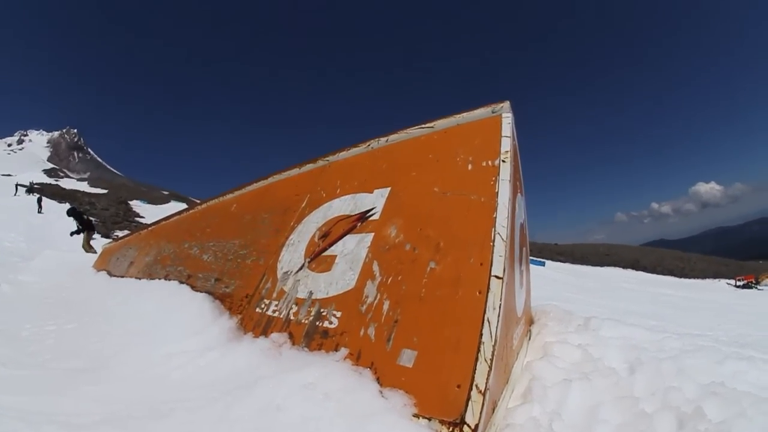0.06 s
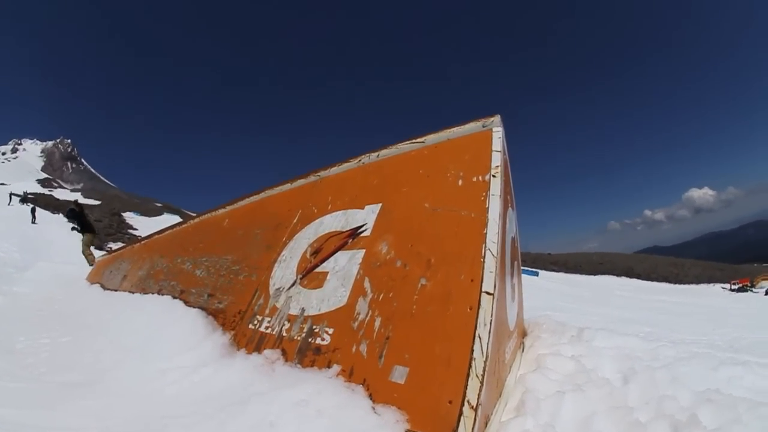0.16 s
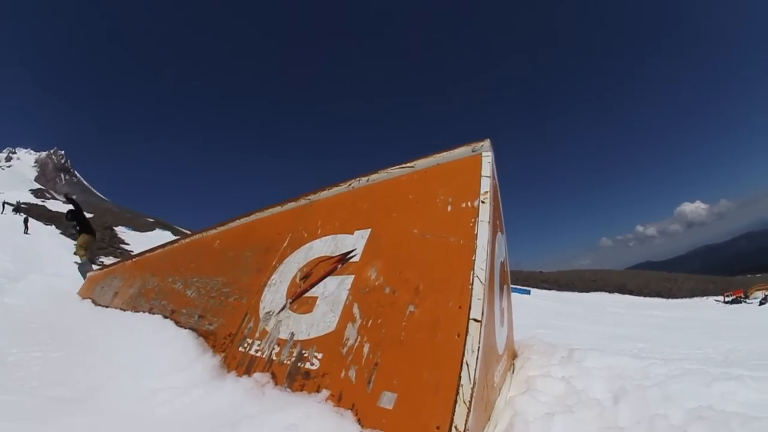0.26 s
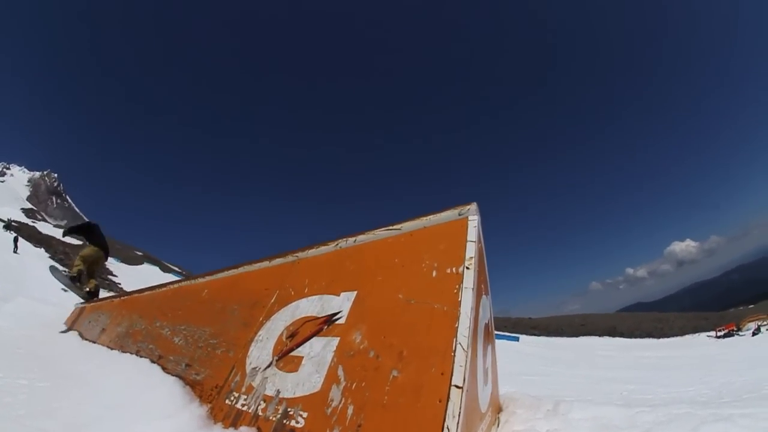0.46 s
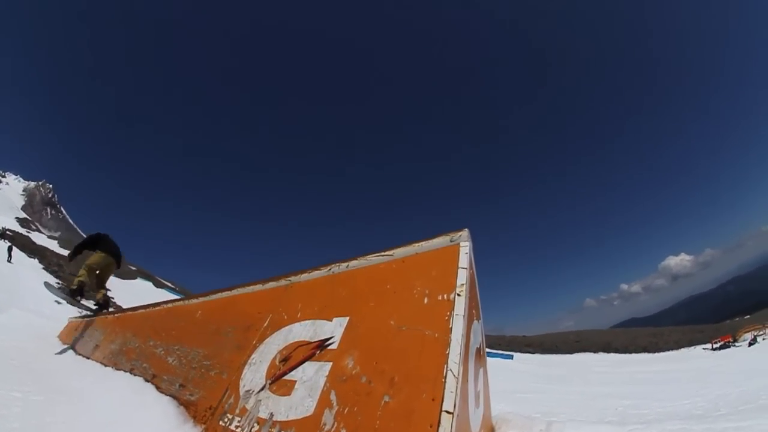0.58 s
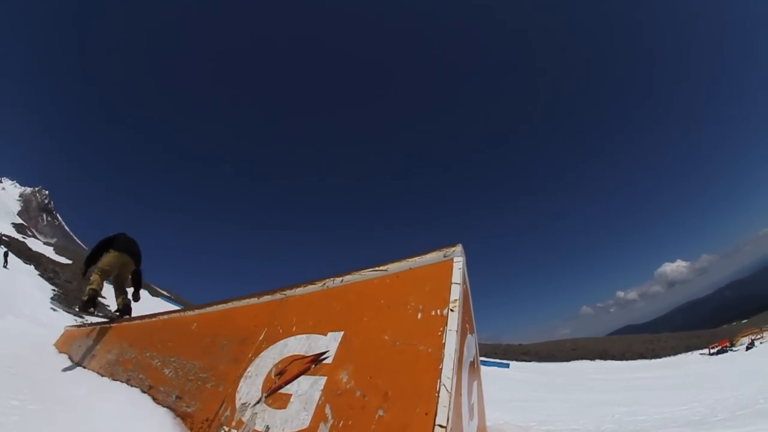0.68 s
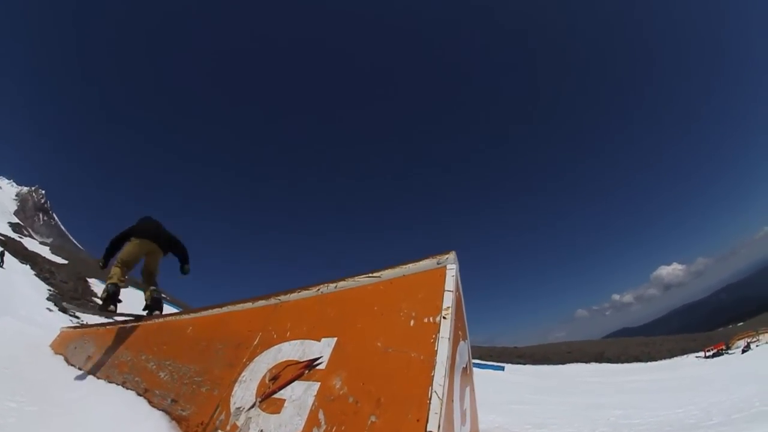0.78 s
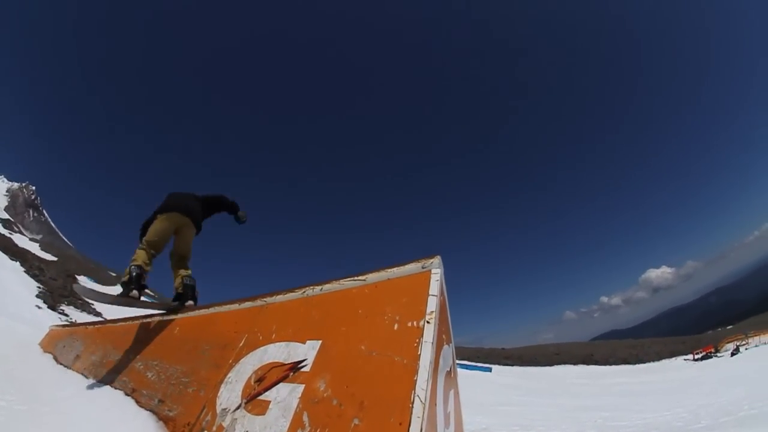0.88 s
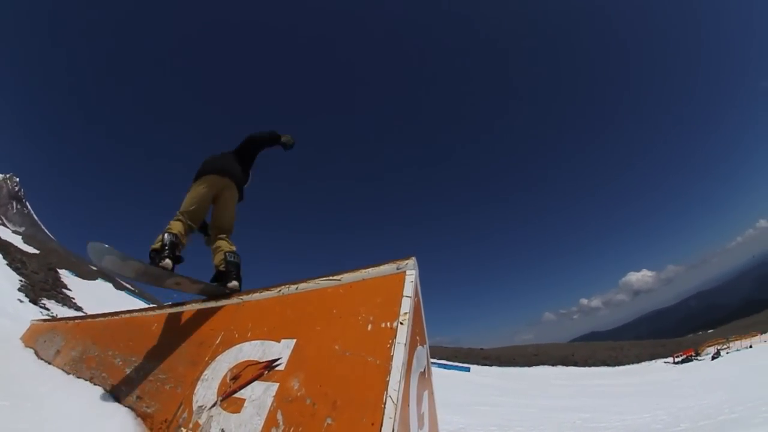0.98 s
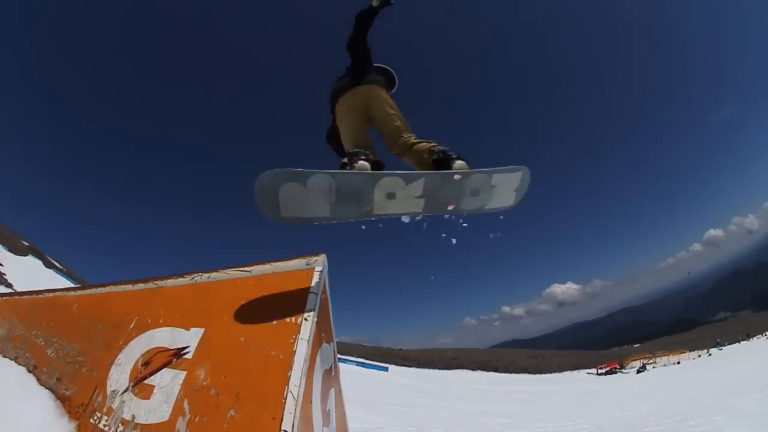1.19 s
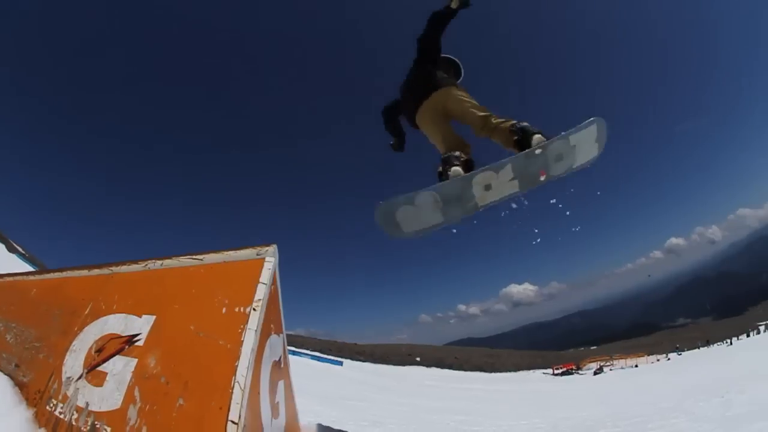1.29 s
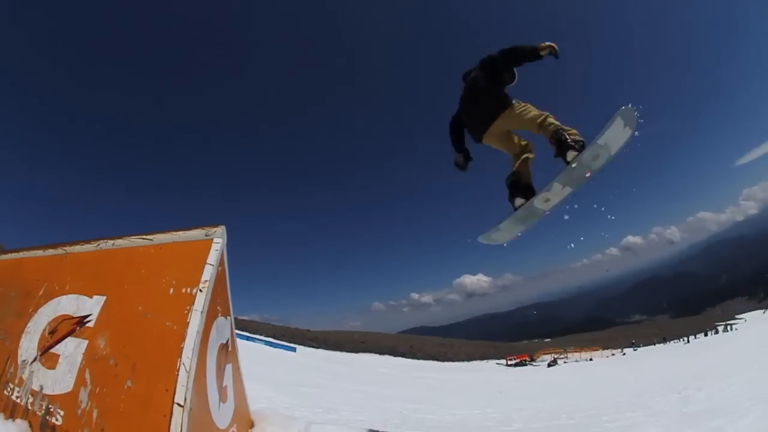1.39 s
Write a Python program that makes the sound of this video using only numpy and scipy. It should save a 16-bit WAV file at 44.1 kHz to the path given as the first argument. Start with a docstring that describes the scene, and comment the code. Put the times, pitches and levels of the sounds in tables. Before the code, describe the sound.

A snowboard hisses over wet snow, smacks onto a hollow ramp with a loud crack, then grinds up it and rasps off the lip. Wind buffets the close microphone on an open slope, and snow crumbs tick against it.

```python
"""A second board following behind hisses steadily over wet spring snow; the rider carves, then lands on a
hollow ramp with a loud crack. It grinds up the ramp, rumbles and rasps off the lip; the steel edge rings
briefly in the air. Scrapes are countless tiny slips and crushed ice grains; on the ramp they excite board and
ramp modes. Wind buffets the moving microphone, and crumbs of snow tick against it."""
import sys
import numpy as np
from scipy import signal
from scipy.fft import rfft, irfft, next_fast_len
from scipy.io import wavfile
from scipy.ndimage import uniform_filter1d

SR = 44100
rng = np.random.default_rng(int(sys.argv[2]) if len(sys.argv) > 2 else 0)


def pcm_store(signal):
    """Save signal as 16-bit PCM."""
    levels = np.round(np.clip(np.atleast_2d(signal), -1, 1) * 32767)
    wavfile.write(sys.argv[1], SR, levels.astype(np.int16).T)


N = 63945
T = np.arange(N) / SR


def amp(db):
    """Decibels to gain."""
    return 10 ** (np.asarray(db) / 20)


def unit(x):
    """Scale to rms 1."""
    return x / np.sqrt(np.mean(x ** 2) + 1e-20)


def level(curve):
    """Gain along a level curve; falls 800 dB/s outside it."""
    time_s, db = np.transpose(curve)
    outside_s = np.maximum(time_s[0] - T, 0) + np.maximum(T - time_s[-1], 0)
    return amp(np.interp(T, time_s, db) - 800 * outside_s)


def colour(x, tone):
    """Minimum-phase filter of unit energy with the given spectral shape."""
    size = next_fast_len(2 * N)
    hz, db = np.transpose(tone)
    bin_hz = abs(np.fft.fftfreq(size, 1 / SR))
    log_gain = np.log(amp(np.interp(np.log(bin_hz + 1), np.log(hz), db)))
    response = unit(np.exp(log_gain)) * np.exp(-1j * signal.hilbert(log_gain).imag)
    return np.fft.ifft(np.fft.fft(x, size) * response).real[:N]


def wander(hz):
    """Random drift up to the given rate, rms 1."""
    rolloff = 1 + (np.fft.rfftfreq(N, 1 / SR) / hz) ** 4
    return unit(irfft(rfft(rng.standard_normal(N)) / rolloff, N))


def decay(start_s, decay_s):
    """Sudden start, exponential fall."""
    return (T >= start_s) * np.exp(-np.maximum(T - start_s, 0) / decay_s)


def ring(modes, t60_s):
    """Sum of dying modes."""
    return sum(amp(db - 60 * T / t60_s) * np.sin(2 * np.pi * hz * T) for hz, db in modes)


def bursts(rows, tone):
    """Short noise bursts of one colour."""
    envelope = sum(amp(db) * decay(start_s, decay_s) for start_s, db, decay_s in rows)
    return colour(rng.choice([-1, 1], N) * envelope, tone)


def wind():
    """Wind on the microphone: lumpy rumble and low buffets of a cycle or two."""
    # rumble envelope (time [s], level [dB])
    rumble_curve = [(0, -33), (.12, -32.5), (.175, -38), (.28, -32.5), (.41, -30.5), (.53, -28),
                    (.88, -28.5), (1.08, -45), (1.2, -36), (1.45, -40)]
    # rumble spectrum (frequency [Hz], relative level [dB])
    rumble_tone = [(25, -26), (60, 6), (150, 6), (250, -10.5), (400, -12), (1000, -16), (2500, -27),
                   (16000, -64)]
    # buffets and bumps (crest time [s], level [dB], pitch [Hz])
    buffets = [(.091, -20, 79.5), (0.259, -10.5, 132), (0.268, -12, 168), (0.299, -13, 156),
               (0.311, -14, 161), (0.386, -16.5, 162), (0.502, -14.5, 221), (.522, -13.5, 255),
               (0.533, -15.5, 170), (0.561, -12.5, 200), (0.599, -8, 176), (0.613, -9.5, 250),
               (.64, -7.5, 171), (0.676, -13, 180), (0.726, -18.5, 162), (1.219, -21.5, 94.5),
               (1.266, -14, 161), (1.287, -12, 118), (1.344, -20, 394)]
    lump_db, width_cycles = 2, 0.39
    rumble = colour(rng.standard_normal(N), rumble_tone)
    out = unit(rumble * amp(lump_db * wander(hz=29.5))) * level(rumble_curve)
    for (crest_s, db, hz), phase in zip(buffets, rng.random(len(buffets))):
        cycles = (T - crest_s) * hz
        envelope = amp(db) / np.cosh(np.clip(cycles / width_cycles, -20, 20))
        out += envelope * np.cos(2 * np.pi * (cycles + phase))
    return out


def ice_ticks():
    """Flying crumbs of icy snow land; harder chips hit the camera housing."""
    # impacts (time [s], level [dB], decay [s])
    crumbs = [(.537, -24, 0.0064), (.884, -20, 0.0056), (1.191, -25.5, 0.0017), (1.279, -16, 0.0025),
              (1.352, -23, 0.0023), (1.358, -18.5, 0.0054)]
    chips = [(1.4166, -15.5, .0007), (1.419, -28, .0018), (1.4425, -27, .0013)]
    # impact spectra (frequency [Hz], relative level [dB])
    crumb_tone = [(1000, -48), (5000, -9.5), (8000, 1), (11800, 7.5), (14000, 6), (16000, -1.5)]
    chip_tone = [(1200, 4), (11000, -3), (16000, -15)]
    return bursts(crumbs, crumb_tone) + bursts(chips, chip_tone)


def slips(spread_db):
    """Tiny slips and crushed ice grains of uneven size, bunched by board chatter."""
    grains_per_s, hiss_gain, chatter_db = 5000, 0.49, 1.5
    sizes = amp(spread_db * np.minimum(rng.exponential(1, N), 4))
    grains = unit(sizes * rng.choice([-1, 1], N) * (rng.random(N) < grains_per_s / SR))
    hiss = hiss_gain * rng.standard_normal(N)
    return unit((grains + hiss) * amp(chatter_db * wander(hz=143)))


def patchy(x, patch_s=.025, patch_hz=420, depth_db=2.1):
    """The contact's colour shifts from moment to moment."""
    hz, time_s, spectra = signal.stft(x, SR, nperseg=256)
    field = uniform_filter1d(rng.standard_normal(spectra.shape), round(patch_hz / hz[1]), axis=0)
    field = unit(uniform_filter1d(field, round(patch_s / time_s[1]), axis=1))
    return signal.istft(spectra * amp(depth_db * field), SR, nperseg=256)[1][:N]


def rub(curve, tone, spread_db):
    """Friction: slips with one spectrum and one envelope."""
    return unit(colour(patchy(slips(spread_db)), tone)) * level(curve)


def snow():
    """Boards on snow: the following board's smooth glide, the rider's carve, the crunch of pushing off."""
    # friction envelopes (time [s], level [dB])
    glide_curve = [(0, -36.5), (.17, -34.5), (.32, -35), (.338, -49), (1.08, -36), (1.125, -35.5),
                   (1.23, -40.5), (1.34, -35), (1.45, -35)]
    carve_curve = [(.18, -33), (.201, -26), (.235, -28.5), (.255, -26), (.275, -44), (.33, -40)]
    takeoff_curve = [(.255, -36), (.278, -25), (.306, -18), (.322, -18), (.336, -52)]
    # friction spectra (frequency [Hz], relative level [dB])
    glide_tone = [(100, -9.5), (400, 4), (1000, -1.5), (1700, -5.5), (2700, -4), (5500, -9), (8200, -17),
                  (12000, -10), (16000, -15.5)]
    carve_tone = [(150, 2), (600, 3.5), (1500, 4), (2600, 7), (5500, -6.5), (8300, -14.5), (12500, -4.5),
                  (16000, -16)]
    takeoff_tone = [(200, -17), (900, -17), (1900, -7), (2750, 1), (3600, -8), (6200, -24.5), (8000, -31),
                    (16000, -38)]
    glide = unit(colour(rng.standard_normal(N), glide_tone)) * level(glide_curve)
    carve = rub(carve_curve, carve_tone, spread_db=2.5)
    takeoff = rub(takeoff_curve, takeoff_tone, spread_db=0)
    return glide + carve + takeoff


def free_edge(start_s=1.106):
    """The steel edge rings unsteadily as it leaves the lip."""
    # edge modes (frequency [Hz], level [dB])
    modes = [(4517, -41), (7176, -36.5), (10120, -37.5), (14013, -39)]
    tones = sum(ring([mode], t60_s=.22) * wander(hz=160) for mode in modes)
    return np.concatenate([np.zeros(round(start_s * SR)), tones])[:N]


def edge_swishes():
    """Slips through resonances that glide as the edge rolls over."""
    # resonances (start [s], end [s], first pitch [Hz], last pitch [Hz], level [dB])
    swishes = [(0.196, 0.217, 790, 684, -30.5), (0.214, 0.282, 5670, 4060, -27.5),
               (0.453, 0.504, 4300, 5600, -14), (0.977, 1.005, 1270, 1160, -26.5),
               (1.032, 1.078, 3560, 2970, -17), (1.091, 1.113, 4930, 4230, -17.5)]
    out = np.zeros(N)
    for start_s, end_s, first_hz, last_hz, db in swishes:
        progress = np.clip((T - start_s) / (end_s - start_s), 0, 1)
        centre_hz = first_hz + (last_hz - first_hz) * progress
        width_hz = 0.37 * first_hz
        carrier = np.exp(2j * np.pi * np.cumsum(centre_hz) / SR)
        lowpass = signal.butter(2, width_hz / 2, fs=SR)
        band = carrier * signal.lfilter(*lowpass, slips(spread_db=0) / carrier)  # moving band-pass
        out += amp(db) * np.sin(np.pi * progress) * unit(band.real)
    return out


def through_body(x, ring_db):
    """Add the ringing of board and ramp."""
    # board-on-ramp modes (frequency [Hz], relative level [dB])
    modes = [(433, -3), (565, 16.5), (1075, 13.5), (1453, 7), (1803, 4.5), (2025, 0), (2208, -2), (2812, 3),
             (4128, 6), (4385, 14.5)]
    response = ring(modes, t60_s=.2)
    return x + amp(ring_db) * signal.fftconvolve(x, response / np.linalg.norm(response))[:N]


def grind():
    """The board bites, sprays snow, slides, rumbles over the hollow middle and rasps off the lip."""
    # friction and spray envelopes (time [s], level [dB])
    bite_curve = [(.422, -62), (.428, -34), (.448, -17), (.475, -14.5), (.52, -21.5), (.55, -54)]
    spray_curve = [(.422, -84), (.429, -18), (.472, -18.5), (.54, -37), (.552, -58)]
    slide_curve = [(.44, -32), (.585, -30), (.64, -28), (.71, -29.5), (.755, -34), (.81, -26.5),
                   (.88, -22.5), (.95, -42), (1.0, -21.5)]
    hollow_curve = [(.79, -50), (.83, -37), (.87, -21), (.885, -20.5), (.917, -21.5), (.935, -32.5),
                    (1.02, -37)]
    lip_curve = [(.89, -23), (.94, -23), (.968, -16.5), (.98, -15.5), (1.015, -12.5), (1.033, -15.5),
                 (1.046, -10), (1.06, -12), (1.072, -24.5), (1.088, -22.5), (1.103, -17.5), (1.118, -40)]
    # their spectra (frequency [Hz], relative level [dB])
    bite_tone = [(200, -41), (900, -44), (1400, -4.5), (2300, 4), (3600, -4.5), (4300, -7.5), (6800, -6),
                 (9000, -14.5), (16000, -34)]
    spray_tone = [(1000, -9.5), (5000, 3.5), (8000, -10), (12500, -2), (16000, -9)]
    slide_tone = [(150, -12), (850, -4), (1800, 1), (2300, 1), (3800, -1.5), (6300, -4.5), (9000, -10.5),
                  (13000, -10), (16000, -15)]
    hollow_tone = [(200, 5.5), (500, 8.5), (750, 1.5), (1100, 9.5), (1450, 5), (2000, -1.5), (4500, -25)]
    lip_tone = [(200, -30), (850, -23.5), (1300, -0.5), (1750, -7), (2300, 2.5), (2800, -0.5), (4500, -2),
                (7000, -0.5), (9000, -3), (13000, -1.5), (16000, -12.5)]
    bite = through_body(rub(bite_curve, bite_tone, spread_db=1.5), ring_db=-9.5)
    spray = rub(spray_curve, spray_tone, spread_db=-23)
    slide = rub(slide_curve, slide_tone, spread_db=1.5)
    hollow = rub(hollow_curve, hollow_tone, spread_db=4.5)
    lip = through_body(rub(lip_curve, lip_tone, spread_db=0.5), ring_db=-18)
    return bite + spray + through_body(slide + hollow, ring_db=-21) + lip


def board_slaps():
    """The board slaps the ramp; both ring faintly."""
    # slaps (time [s], level [dB], decay [s])
    slaps = [(.4362, 3.5, 0.0022), (.4392, -25, 0.0046), (.5565, -15.5, 0.0085), (.8825, -10, 0.0054),
             (.9028, -16, 0.0015), (.911, -16, 0.0037)]
    # slap spectrum (frequency [Hz], relative level [dB])
    slap_tone = [(280, -25.5), (450, 7), (700, -1.5), (1450, 8), (2500, 0.5), (6000, -5), (16000, -30)]
    return through_body(bursts(slaps, slap_tone), ring_db=-29.5)


def landing_crack(start_s=.4362):
    """The board smacks flat onto the ramp: a very loud, very short crack over a hollow knock."""
    # landing modes (frequency [Hz], level [dB], decay [s])
    modes = [(2500, 23, .0007), (4120, -7, .007), (431, -14.5, .017), (870, -16, .008)]
    age_s = np.maximum(T - start_s, 0)
    out = np.zeros(N)
    for hz, db, decay_s in modes:
        attack = np.minimum(age_s * hz, 1)  # one cycle
        out += amp(db) * attack * decay(start_s, decay_s) * np.sin(2 * np.pi * hz * age_s)
    return out


def scene():
    """Mono mix at the microphone."""
    hits = landing_crack() + board_slaps()
    ticks = ice_ticks()
    scrapes = snow() + grind() + edge_swishes()
    return (hits + ticks + scrapes + free_edge() + wind())[None]


def record(dry):
    """The landing overloads the recorder: hard clip, then low-pass."""
    ceiling, cutoff_hz = .98, 15800
    clipped = np.clip(dry, -ceiling, ceiling)
    lowpass = signal.firwin(511, cutoff_hz, window=("kaiser", 8), fs=SR)
    return signal.oaconvolve(clipped, lowpass[None], "same")


dry = scene()
out = record(dry)
pcm_store(out)
```